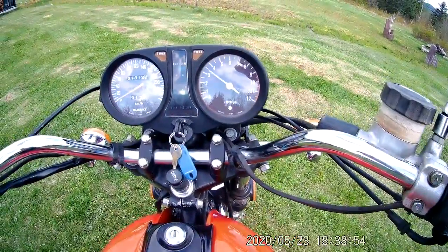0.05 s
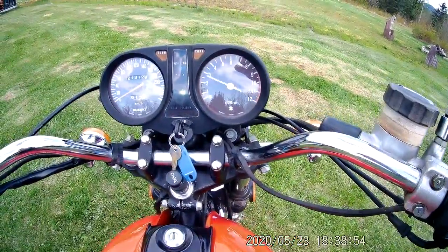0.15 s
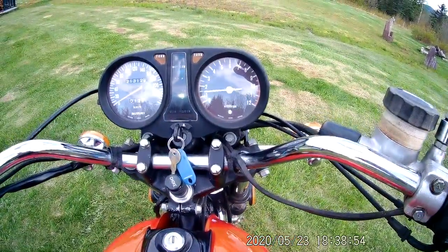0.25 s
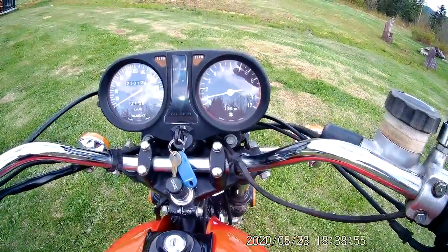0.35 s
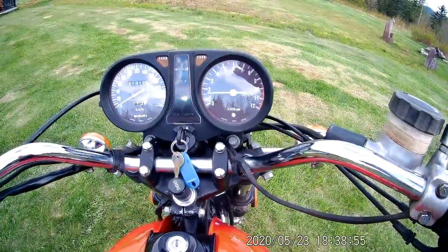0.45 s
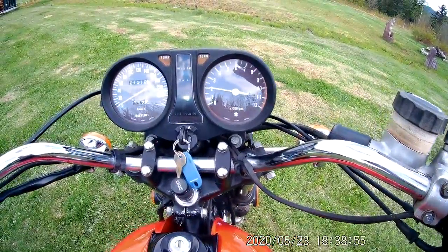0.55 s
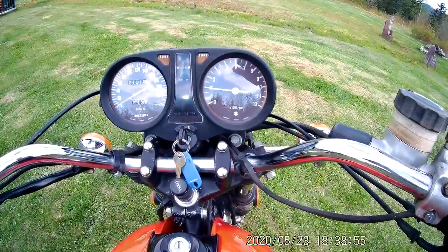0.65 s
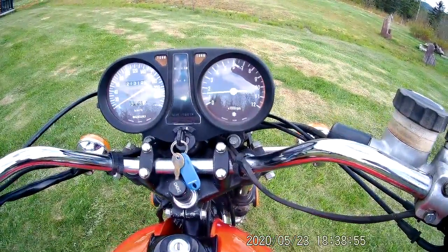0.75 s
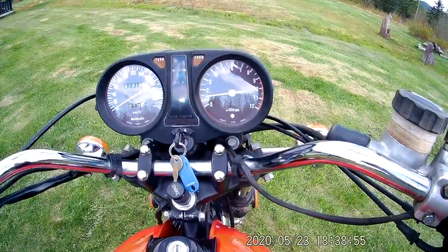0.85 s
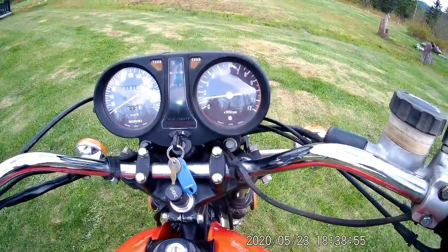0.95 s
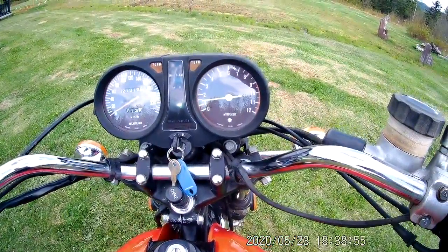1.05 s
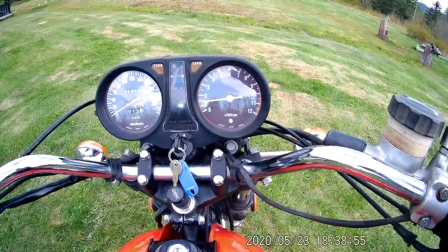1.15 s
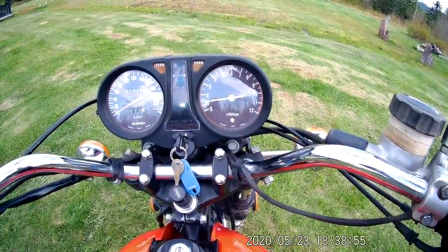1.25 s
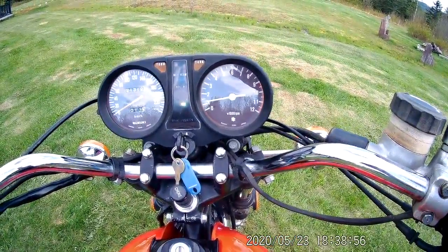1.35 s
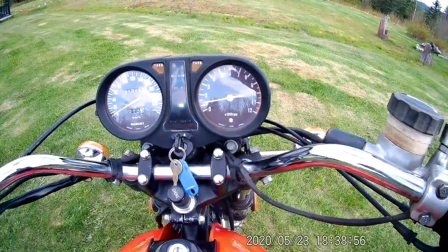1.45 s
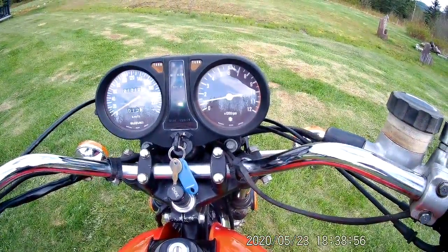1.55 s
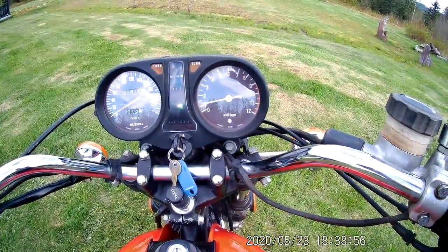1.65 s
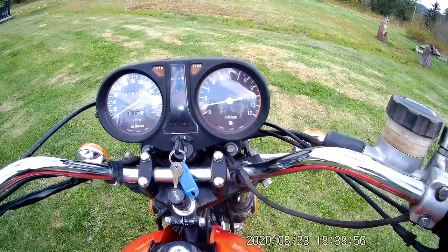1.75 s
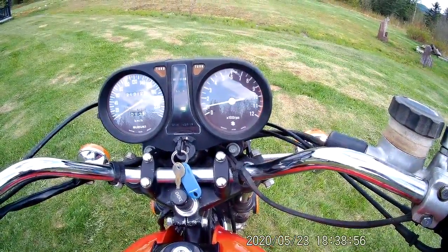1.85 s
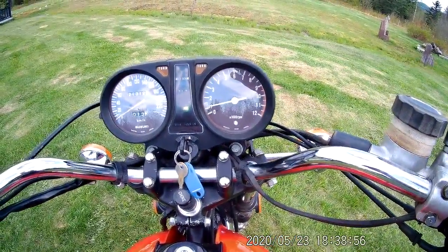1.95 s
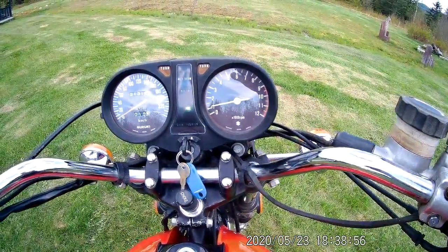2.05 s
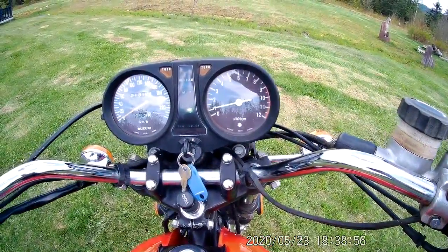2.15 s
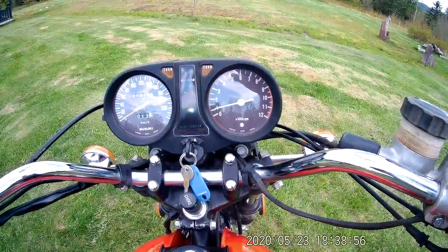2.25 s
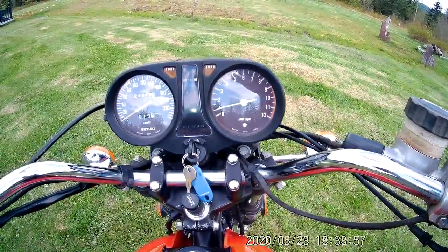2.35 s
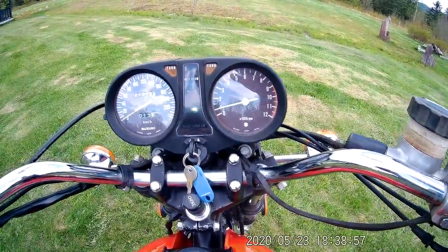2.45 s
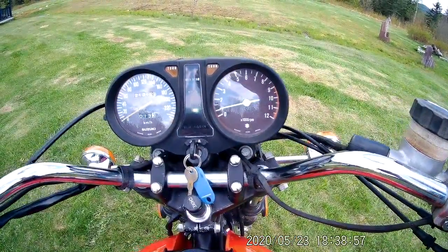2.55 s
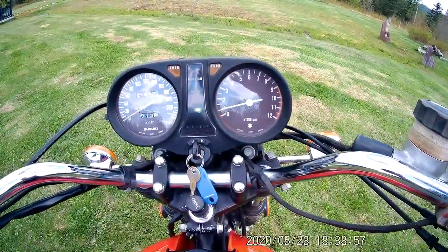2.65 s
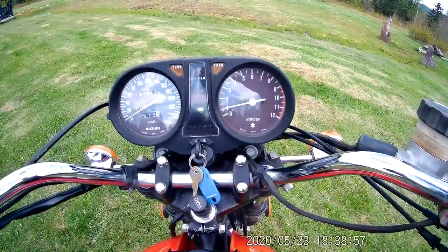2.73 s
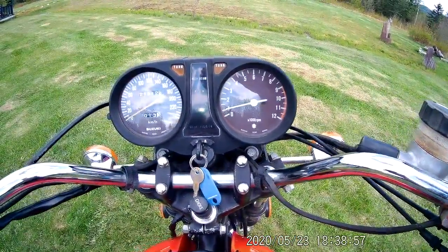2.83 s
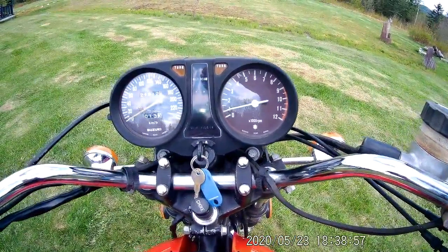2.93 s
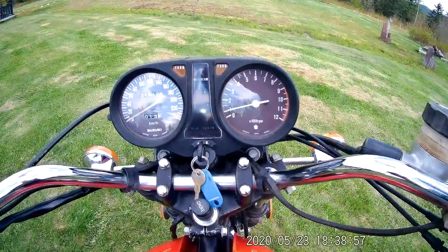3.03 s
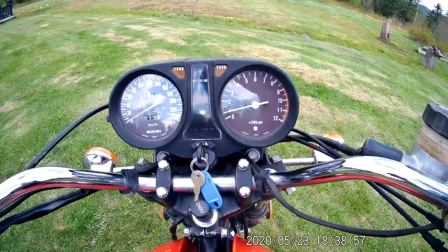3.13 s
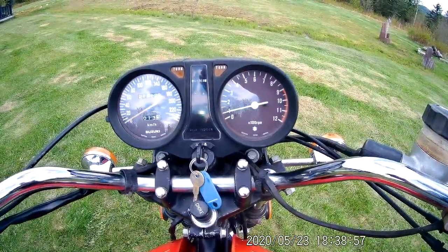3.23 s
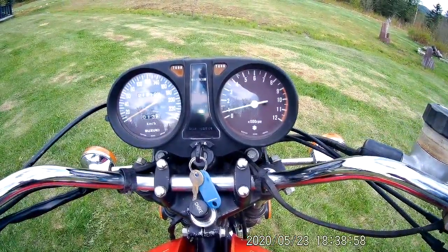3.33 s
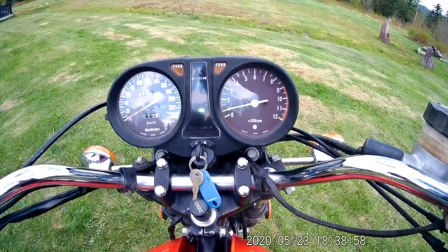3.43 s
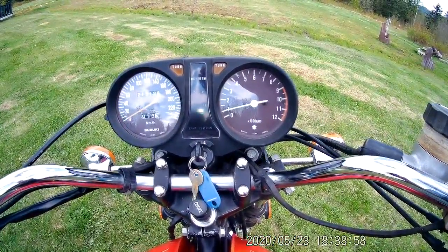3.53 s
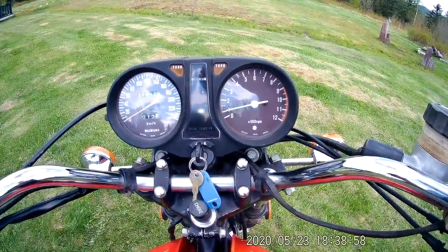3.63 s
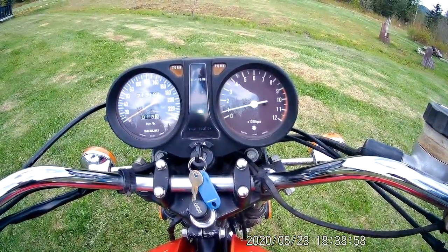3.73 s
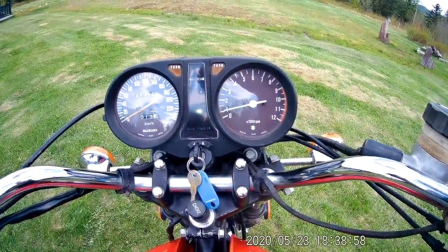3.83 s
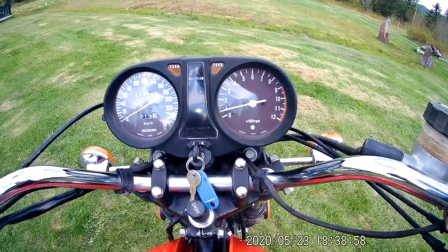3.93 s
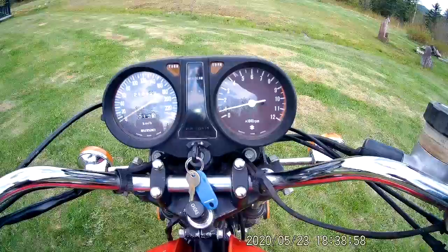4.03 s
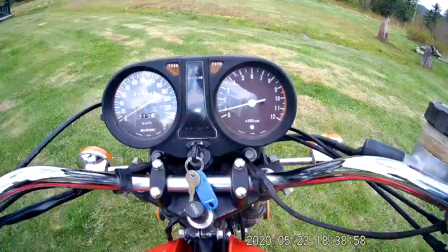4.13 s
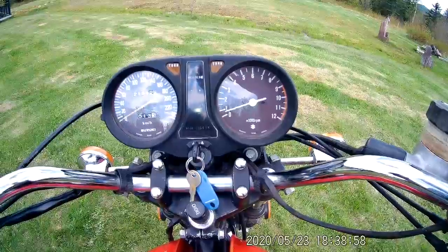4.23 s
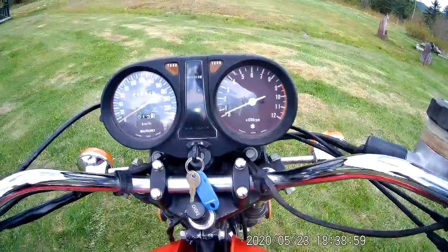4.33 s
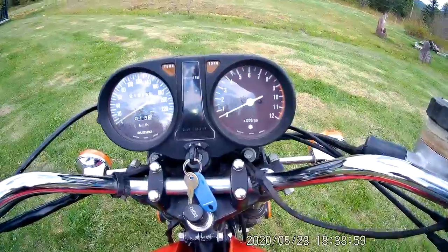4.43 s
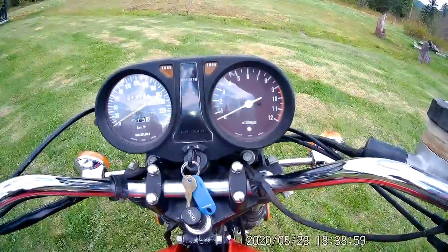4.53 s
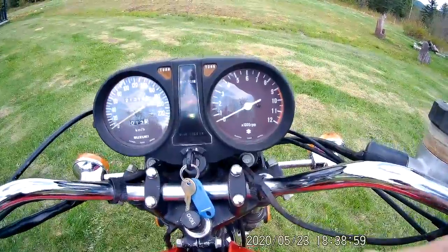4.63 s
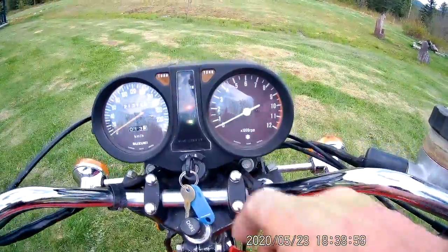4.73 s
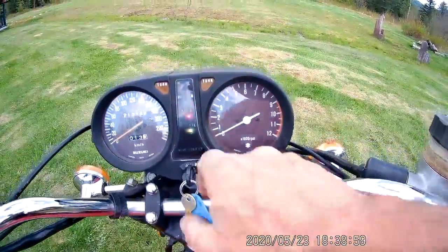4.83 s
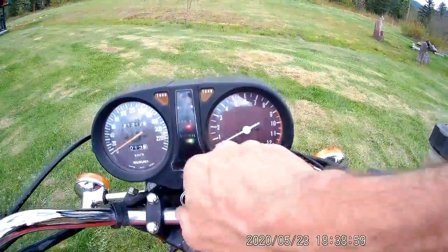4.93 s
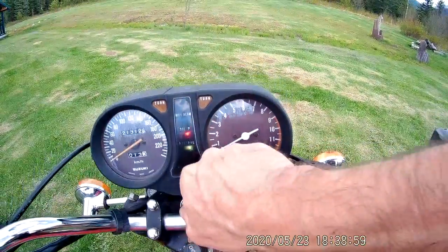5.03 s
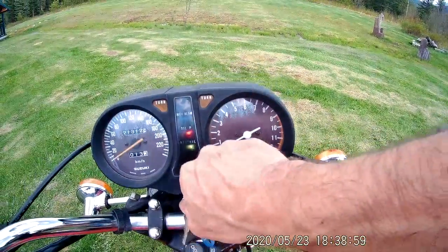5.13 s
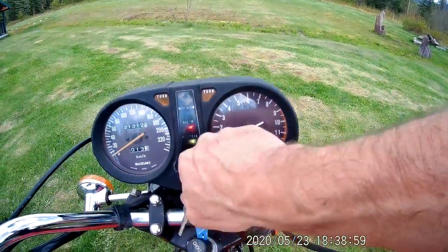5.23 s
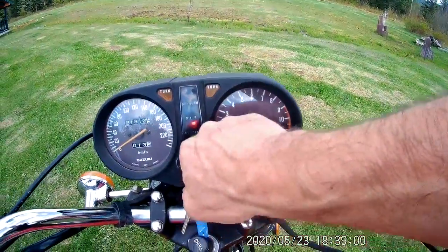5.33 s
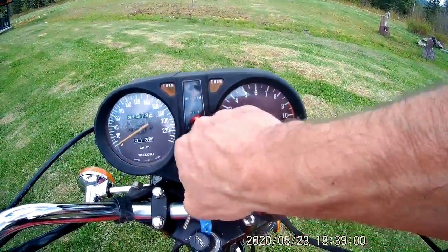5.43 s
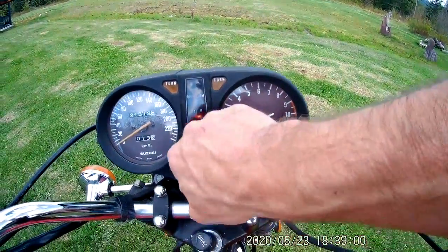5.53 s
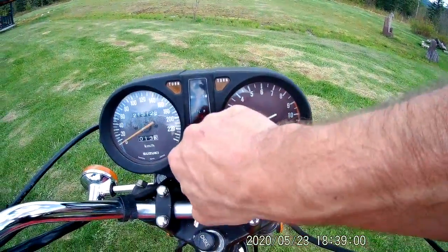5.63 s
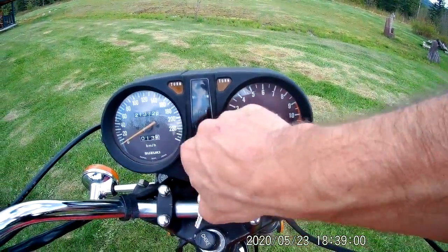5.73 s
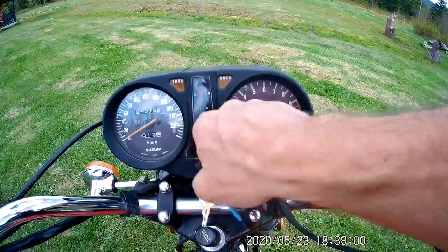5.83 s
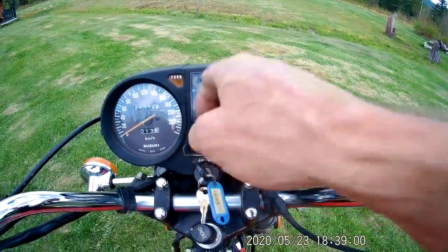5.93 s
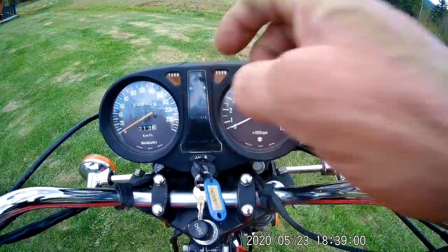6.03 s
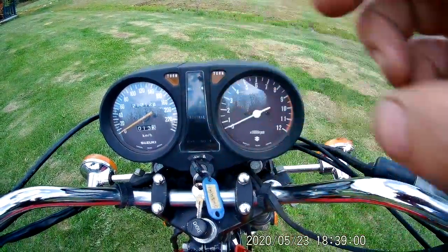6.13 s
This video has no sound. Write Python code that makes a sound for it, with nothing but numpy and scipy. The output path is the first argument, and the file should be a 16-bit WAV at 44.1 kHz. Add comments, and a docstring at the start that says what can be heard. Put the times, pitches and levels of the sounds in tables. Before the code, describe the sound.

A close motorcycle drops to an uneven, clattering idle outdoors, then cuts out, followed by faint key ticks and an ignition lock click.

```python
"""A four-cylinder motorcycle, heard from the saddle on a lawn, sinks from a blip of throttle to a lumpy idle.
Its exhaust is a pulse train filtered by pipes and silencers; impacts of valves, chain and clutch excite
the modes of the cases and fins. The kill switch snaps, the crank runs down and stops with a clunk, then
the keys jingle and the ignition lock clicks off. Trees scatter a faint echo through the still air."""
import sys
import numpy as np
from scipy import signal
from scipy.fft import rfft, irfft
from scipy.io import wavfile
from scipy.ndimage import uniform_filter1d

SR = 44100
rng = np.random.default_rng(int(sys.argv[2]) if len(sys.argv) > 2 else 0)


def transcribe(signal):
    """Save signal, clipped to [-1, 1], as a 16-bit WAV file at the path in sys.argv[1]."""
    frames = np.atleast_2d(signal).T
    limited = np.clip(frames, -1, 1)
    pcm = np.round(limited * 32767).astype(np.int16)
    wavfile.write(sys.argv[1], SR, pcm)


N = 272582
TIME = np.arange(N) / SR


def amp(db):
    """Decibels to amplitude ratio."""
    return 10 ** (np.asarray(db) / 20)


def decay(t, t60):
    """Exponential damping: 60 dB in t60 seconds."""
    return np.exp(-np.log(1000) * t / t60)


def unit_rms(x):
    """Normalisation to an rms of 1."""
    return x / np.sqrt(np.mean(x ** 2))


def unit_peak(x):
    """Normalisation to a peak of 1."""
    return x / np.abs(x).max()


def levelled(x, span_s=0.27):
    """Normalisation to a running rms of 1."""
    power = uniform_filter1d(uniform_filter1d(x ** 2, int(span_s * SR)), int(span_s * SR / 2))
    return x / np.sqrt(np.abs(power) + np.mean(x ** 2) / 10 ** 3)


def colour(x, spectrum):
    """Minimum-phase filtering by a response given as (Hz, dB) points."""
    hz, db = np.transpose(spectrum)
    size = 4096
    bin_hz = np.arange(size + 1) * SR / 2 / size
    gain = amp(np.interp(np.log(bin_hz + 1), np.log(hz), db))
    cepstrum = irfft(np.log(gain))
    cepstrum[1:size] *= 2  # folding the cepstrum makes the filter causal
    cepstrum[size + 1:] = 0
    response = irfft(np.exp(rfft(cepstrum)))[:size]
    return signal.fftconvolve(x, response)[:N]


def noise(spectrum):
    """Filtered Gaussian noise of rms 1."""
    return unit_rms(colour(rng.standard_normal(N), spectrum))


def tilted(spectrum, db_per_octave):
    """Spectral tilt about 1 kHz."""
    return [(hz, db + db_per_octave * np.log2(hz / 1000)) for hz, db in spectrum]


def ring(x, modes):
    """Modal superposition: parallel resonators given as (Hz, bandwidth in Hz, dB)."""
    return sum(amp(db) * signal.lfilter(*signal.iirpeak(hz, hz / width, fs=SR), x)
               for hz, width, db in modes)


def impulses(times, sizes):
    """An impulse train, with times in seconds."""
    return np.bincount(np.clip(np.asarray(times) * SR, 0, N).astype(int), sizes, N + 1)[:N]


def burst(t60):
    """Damped noise stands for the dense modes of a struck part."""
    return rng.standard_normal(SR // 2) * decay(TIME[:SR // 2], t60)


def rattle(blows, t60):
    """Amplitude modulation: each impulse opens a decaying envelope on noise."""
    return signal.lfilter([1], [1, -decay(1 / SR, t60)], blows) * rng.standard_normal(N)


def hit(start_s, peak_db, t60, spectrum):
    """One impact as a filtered noise burst."""
    blow = amp(peak_db) * unit_peak(colour(burst(t60), spectrum))
    return np.pad(blow, (int(start_s * SR), N))[:N]


def struck(times, peak_db, modes, contact_s=0):
    """Impulse excitation of modes; a longer contact softens the attack."""
    attack = np.minimum((TIME + 1 / SR) / (contact_s + 1 / SR), 1)
    tone = unit_peak(ring(impulses([0], [1]), modes) * attack)
    return signal.fftconvolve(impulses(times, amp(peak_db)), tone[:SR])[:N]


def passes(cycles, phase):
    """The times at which the engine cycle reaches a phase from 0 to 1."""
    return np.interp(np.arange(phase, cycles[-1], 1), cycles, TIME)


def scatter(times, spread_db):
    """A bounded log-normal strength for each stroke."""
    return amp(spread_db * np.clip(rng.standard_normal(len(times)), -2, 2))


def wander(rate_hz):
    """Slow random modulation with a spread near 1."""
    steps = np.arange(0, N / SR + 1, 1 / rate_hz)
    return np.interp(TIME, steps, rng.standard_normal(len(steps)))


# Each row: frequency in Hz, relative spectral density in dB.
AIR_SPECTRUM = [(15, -34), (25, 4), (91, -5.5), (113, -4.5), (178, -5), (297, -12), (582, -17.5),
                (804, -20.5), (8130, -34.5), (11800, -28), (15500, -29)]

def still_air(db=-61):
    """Ambient noise: still country air, strongest in the bass."""
    return amp(db) * noise(AIR_SPECTRUM)


def tree_echo(x, t60=0.93, wet_db=-22):
    """Diffuse scattering: the trees round the lawn return a faint, dull echo."""
    spectrum = [(80, -9.5), (200, -6), (600, -2.5), (2000, -22.5), (9000, -11.5)]
    tail = colour(rng.standard_normal(N) * decay(TIME, t60), spectrum)
    return amp(wet_db) * signal.fftconvolve(x, unit_rms(tail) / np.sqrt(N))[:N]


# Each row: frequency in Hz, relative level in dB.
DYING_HISS_SPECTRUM = [(1000, -4), (3500, -5), (8000, -6), (8600, 3), (9200, -13.5), (12000, 2),
                       (15500, -15.5)]

def dying_hiss(db=-60, t60=2.4, stop_s=4.54):
    """Exponential decay: a faint hiss dies away once the engine is still."""
    return amp(db) * decay(np.maximum(TIME - stop_s, 0), t60) * noise(DYING_HISS_SPECTRUM)


# Each row: start in seconds, peak level in dB, 60 dB decay time in seconds, tilt in dB per octave.
KEY_TOUCHES = [(5.174, -47, .05, -0.5), (5.19, -50, 0.034, -4), (5.197, -42.5, .01, 2),
               (5.204, -47, .02, -2), (5.261, -48.5, 0.097, 3)]
# Each row: frequency in Hz, relative level in dB.
KEY_SPECTRUM = [(400, -14), (1700, 7), (2600, -12), (3800, 5), (5500, -14), (8500, -7), (13000, -20),
                (16000, -21)]
# Each row: frequency in Hz, bandwidth in Hz, gain in dB.
KEY_RESONANCES = [(3730, 69, -6), (8140, 17, 5), (10070, 24, -6), (12000, 28, -5)]

def keys():
    """Free vibration: hanging keys, brushed by fingers, tick and ring in lightly damped modes."""
    ticks = sum(hit(s, db, t60, tilted(KEY_SPECTRUM, tilt)) for s, db, t60, tilt in KEY_TOUCHES)
    return ticks + struck([5.262], [-44.5], KEY_RESONANCES)


# Each row: start in seconds, peak level in dB, 60 dB decay time in seconds, tilt in dB per octave.
LOCK_IMPACTS = [(5.547, -47.5, 0.042, -1), (5.593, -38, 0.08, -1.5), (5.5976, -24.5, 0.0076, 1),
                (5.6, -31, 0.022, 4), (5.614, -43, .03, 19), (5.636, -32, 0.009, 4), (5.731, -54, .024, 3),
                (5.959, -40.5, 0.02, -1)]
# Each row: frequency in Hz, relative level in dB.
LOCK_SPECTRUM = [(150, -16), (600, -1), (850, -6), (1150, 4), (1750, 2), (2200, -13.5), (3000, -10),
                 (3600, 2), (5000, -13), (6800, -17), (8100, -8), (9500, -56), (15000, -60)]
# Each row: frequency in Hz, bandwidth in Hz, gain in dB.
BARREL_RESONANCES = [(622, 49, -9), (1120, 80, -1), (1820, 120, -9)]

def ignition_lock():
    """Structural coupling: the barrel clicks into its stop and the instrument housing rings on."""
    clicks = sum(hit(s, db, t60, tilted(LOCK_SPECTRUM, tilt)) for s, db, t60, tilt in LOCK_IMPACTS)
    lock = clicks + struck([5.5988], [-31], BARREL_RESONANCES, contact_s=0.0012)
    housing = signal.fftconvolve(lock, burst(t60=0.17))[:N]
    return lock + amp(-43) * housing


# Each row: frequency in Hz, relative level in dB.
SWITCH_SPECTRUM = [(500, -20), (1000, 2), (1600, 8), (3000, -1), (4200, 0), (6000, -3), (8000, -3),
                   (9300, 6), (11300, -5), (13500, 2), (16000, -8)]

def kill_switch():
    """A brief impact has a broad spectrum: the switch snaps over."""
    return hit(start_s=4.0628, peak_db=-6.5, t60=0.007, spectrum=SWITCH_SPECTRUM)


# The cam chain meshes 30 times a cycle, with sidebands spaced at the crank rate.
# Each row: multiple of the cycle rate, relative level in dB.
MESH_ORDERS = [(16, -7.5), (28, -9), (30, 1), (32, -5.5), (34, -8)]
# Each row: frequency in Hz, bandwidth in Hz, gain in dB.
COVER_RESONANCES = [(239.8, 28, 1), (323.4, 38, -2), (376.2, 26, -2), (484, 21, -4), (562, 70, 0)]

def chain_whine(cycles, flutter_db=2.5, phase_wobble=0.51):
    """Forced vibration: mesh tones glide with the revs and swell at each resonance of the covers."""
    looseness = np.interp(TIME, [.9, 2.2], [.7, 1.7])  # taut on the overrun, flapping at idle
    tones = 0
    for order, db in MESH_ORDERS:
        strength = amp(db + flutter_db * looseness * wander(22))
        phase = 2 * np.pi * order * cycles + phase_wobble * looseness * wander(30)
        tones += strength * np.sin(phase)
    load_db = np.interp(TIME, [0, .3, .5, 4.05, 4.2, 4.5], [-11.5, -13.5, 0, 3, -16, -15.5])
    return ring(tones, COVER_RESONANCES) * amp(load_db)


# The hiss of chain and fins. Each row: frequency in Hz, relative level in dB.
FIN_SPECTRUM = [(1800, -9.5), (3300, -10), (4040, 6.5), (4400, -2), (4800, -1.5), (5200, -14.5),
                (6100, -18.5), (7300, -5.5), (8200, -6.5), (9150, -9), (10200, -10.5), (12000, -10),
                (13700, -18.5), (15500, -31.5)]
# Each row: frequency in Hz, bandwidth in Hz, gain in dB.
FIN_RESONANCES = [(4020, 130, 0), (4300, 120, -2.5), (6800, 150, -12), (7396, 95, -7), (7890, 130, -9),
                  (8680, 150, -9.5), (9000, 150, -8.5), (9180, 110, -6)]

def cooling_fins(blows):
    """Modal overlap: struck and rubbed, the fins' close modes merge into a hiss; a few sing out."""
    shimmer = unit_rms(signal.fftconvolve(blows + rng.standard_normal(N), burst(t60=0.034))[:N])
    rub = unit_rms(amp(3.5) * rng.standard_normal(N) + blows)
    hiss = unit_rms(colour(amp(-4) * shimmer + rub, FIN_SPECTRUM))
    singing = unit_rms(ring(np.abs(blows) * rng.standard_normal(N), FIN_RESONANCES))
    return levelled(hiss + amp(-3) * singing)


# Each row: phase in the cycle from 0 to 1, relative level in dB.
VALVE_SEATINGS = [(.02, -4.5), (.09, -0.5), (.21, -3.5), (.32, -3), (.5, -4.5), (.59, -5), (.7, -2.5),
                  (.765, -1.5)]

def valve_taps(cycles, spread_db=3.5, t60=0.091):
    """Periodic impact: each valve seats once a cycle with a ring of its own."""
    taps = 0
    for phase, db in VALVE_SEATINGS:
        times = passes(cycles, phase)
        seatings = impulses(times, amp(db) * scatter(times, spread_db))
        taps += signal.fftconvolve(seatings, burst(t60))[:N]
    return levelled(taps)


def chain_rattle(cycles, spread_db=2.5, t60=0.024, strikes_per_cycle=40):
    """Load modulation: cam chain links strike the sprocket, harder as each cam loads it."""
    times = np.interp(np.arange(0, cycles[-1], 1 / strikes_per_cycle), cycles, TIME)
    links = impulses(times + rng.random(len(times)) / 1000, scatter(times, spread_db))
    cam_load = 1 + 0.11 * np.sin(2 * np.pi * len(CYLINDER_PULSES) * cycles)
    return levelled(rattle(links, t60) * cam_load)


# Blows on the engine castings. Each row: frequency in Hz, gain in dB.
CASE_SPECTRUM = [(150, -24.5), (280, 6.5), (440, -2), (560, 2.5), (780, -1.5), (1100, 1.5), (1400, 2),
                 (1750, -0.5), (2050, -10), (2700, -19.5), (3400, -30), (4200, -27), (6000, -52.5),
                 (12000, -62)]
# Each row: frequency in Hz, bandwidth in Hz, gain in dB.
CASE_RESONANCES = [(390.6, 10, -2.5), (531.6, 11, -2.5), (719, 4.2, 2), (917.5, 3.6, 1.5),
                   (1033, 11.8, -1.5), (1145, 12, -2.5), (1289, 13, -3.5), (1495.4, 17, 7.5),
                   (1506, 10, 2.5), (1618, 25, -2.5), (1699, 6.5, 3.5), (1824, 28, -3.5), (1947, 11, -9.5),
                   (2118, 6.3, -1), (2480, 18, -10), (2540, 9.4, -20.5)]

def cases(blows, force):
    """Structure-borne sound: the cases radiate the blows and the steady rub of bearings and gears."""
    rubbing = .7 * blows + .7 * rng.standard_normal(N)
    clatter = amp(8.5) * colour(blows * force, CASE_SPECTRUM)
    ringing = amp(13.5) * ring(rubbing * force, CASE_RESONANCES)
    cam_cover = levelled(ring(rubbing, [(1690, 13, 0)]), span_s=0.091)
    high_revs = np.interp(TIME, [.6, 1.2], [1, 0])
    return clatter + ringing + amp(-39) * high_revs * cam_cover


# Each row: start in seconds, peak level in dB.
BACKLASH_KNOCKS = [(0.487, -12), (0.842, -13), (1.753, -11.5), (2.484, -15.5), (3.37, -21.5)]

def drive_knocks(t60=0.057):
    """Backlash: slack in the drive takes up with a hard knock."""
    return sum(hit(s, db, t60, CASE_SPECTRUM) for s, db in BACKLASH_KNOCKS)


# Each row: start in seconds, relative level in dB.
TAPPET_STRIKES = [(0.495, -25), (.632, -21), (.86, -19), (0.927, -14), (1.682, -21), (2.09, -14),
                  (2.293, -15.5), (2.389, -17), (2.77, -13), (2.809, -24), (3.018, -21), (3.081, -18.5),
                  (3.729, -13.5), (3.9, -17.5), (3.953, -19.5), (4.051, -16)]

def loose_tappet(t60=.04):
    """Impact across a clearance: a bright clack, then the free ring of the cases."""
    clacks = sum(hit(s, db, t60, tilted(CASE_SPECTRUM, 9.8)) for s, db in TAPPET_STRIKES)
    ringing = struck(*np.transpose(TAPPET_STRIKES), CASE_RESONANCES)
    return amp(-3) * clacks + amp(-2) * ringing


# Each row: frequency in Hz, bandwidth in Hz, gain in dB.
BASKET_RESONANCES = [(540.4, 27, 9.1), (575, 16, 5.6)]
# The louder knocks. Each row: start in seconds, relative level in dB.
BASKET_STRIKES = [(.514, -20.5), (1.167, -20), (1.314, -16), (1.391, -17), (1.71, -16), (1.749, -19),
                  (1.959, -18), (1.998, -24), (2.08, -17.5), (2.121, -17), (2.438, -17.5), (2.483, -16.5),
                  (2.928, -22.5), (3.017, -28), (3.158, -16), (3.206, -21.5)]

def clutch_basket(cycles, force):
    """Backlash: once the drive goes slack, the basket knocks hollowly each crank turn, at times harder."""
    times = passes(2 * cycles, 0.026)
    knocks = rattle(impulses(times, scatter(times, spread_db=0.5)), t60=0.023)
    slack_db = np.interp(TIME, [.33, .48], [-21.5, -11.5])
    regular = amp(slack_db) * force * levelled(ring(knocks, BASKET_RESONANCES))
    harder = struck(*np.transpose(BASKET_STRIKES), BASKET_RESONANCES, contact_s=0.008)
    return regular + amp(1.5) * harder


# Each row: frequency in Hz, relative level in dB.
CRACK_SPECTRUM = [(100, -18), (380, 1.5), (950, 0), (1400, -2.5), (1800, 0), (2200, -7), (2600, -11),
                  (3200, -17), (3900, -14.5), (4500, -21), (5500, -36), (8500, -44), (14000, -45)]
# Each row: start in seconds, peak level in dB, 60 dB decay time in seconds.
GEAR_CLACKS = [(4.451, -24.5, 0.15), (4.495, -26.5, 0.38), (4.519, -37.5, 0.047), (4.549, -20, 0.13)]

def stop_clunk():
    """Elastic rebound: gears clack, the crank rocks back against compression and the cases ring."""
    crack = hit(start_s=4.5415, peak_db=-18, t60=0.045, spectrum=CRACK_SPECTRUM)
    clacks = sum(hit(s, db, t60, CASE_SPECTRUM) for s, db, t60 in GEAR_CLACKS)
    ringing = ring(crack + clacks, CASE_RESONANCES) + ring(crack, [(2480, 36, 16)])
    return crack + clacks + ringing


# Each row: start in seconds, peak level in dB.
AFTERFIRES = [(.915, -15.5), (1.126, -20)]

def header_pops():
    """Pipe resonance: unburnt charge pops in the header as the revs settle."""
    return struck(*np.transpose(AFTERFIRES), [(195, 38, 0)], contact_s=0.0055)


# Each row: start in seconds, peak level in dB.
LAST_PUFFS = [(4.152, -8.5), (4.184, -11.5), (4.248, -13.5), (4.287, -22), (4.337, -17), (4.403, -31)]
# Each row: frequency in Hz, bandwidth in Hz, gain in dB.
PUFF_RESONANCES = [(45, 40, -5), (99, 42, 0)]

def chugs(t60=0.35):
    """Cavity resonance: with the spark off, separate puffs of unburnt charge boom in the silencers."""
    times, db = np.transpose(LAST_PUFFS)
    ringing = ring(impulses([0], [1]), PUFF_RESONANCES)
    puff = unit_peak(colour(ringing, SILENCER_RESPONSE) * decay(TIME, t60))
    return signal.fftconvolve(impulses(times, amp(db)), puff)[:N]


# Surging exhaust gas. Each row: frequency in Hz, relative level in dB.
GAS_SPECTRUM = [(20, -38.5), (45, -18.5), (70, -12), (95, -3.5), (110, -4), (125, -7), (150, -14.5),
                (200, -15.5), (280, -25), (450, -34.5), (900, -65)]

def burble(cycles, from_s=.77, to_s=1.17, peak_db=-21, t60=.08):
    """Pressure transients: late, strong burns thump in the silencers once a cycle on the overrun."""
    times = passes(cycles, 0.49)
    times = times[(times > from_s) & (times < to_s)]
    burns = impulses(times, np.full(len(times), amp(peak_db)))
    thump = colour(impulses([0], [1]), GAS_SPECTRUM) * decay(TIME, t60)
    return signal.fftconvolve(burns, unit_peak(thump[:SR // 10]))[:N]


# Each row: centre in seconds, drive in dB relative to the exhaust note.
HARD_FIRINGS = [(1.32, -2), (1.965, -6), (2.16, -14), (2.335, -0.5), (2.425, -5.5), (2.52, -7.5),
                (2.89, -9.5), (2.965, -0.5), (3.055, -2), (3.24, -8.5), (3.33, -5), (3.88, -8), (3.97, -5)]
# Each row: frequency in Hz, bandwidth in Hz, gain in dB.
CHAMBER_RESONANCES = [(97, 42, 0)]

def chamber_boom(note, width_s=0.019):
    """Resonant build-up: at idle some firings catch harder and the silencer chamber booms on."""
    swell = sum(amp(db) * np.exp(-((TIME - s) / width_s) ** 2) for s, db in HARD_FIRINGS)
    return ring(note * swell, CHAMBER_RESONANCES)


# In firing order. Each row: relative level in dB, change on a shut throttle in dB, pipe delay in ms.
CYLINDER_PULSES = [(4.5, 0.5, 0.74), (8, -6.5, 0.11), (5, 4, .8), (5, -1, 0.092)]
# Each row: frequency in Hz, gain in dB.
SILENCER_RESPONSE = [(10, -51), (22, -22.5), (31, -3), (44, 1), (65, 2), (88, 3), (108, 5.5), (125, -4.5),
                     (145, -11), (200, -15), (260, -24), (450, -26), (900, -71)]
# Each row: frequency in Hz, bandwidth in Hz, gain in dB.
PIPE_RESONANCES = [(310.3, 5.7, 7.5), (333.4, 13, 5.5), (374, 5.7, -13)]

def exhaust(cycles, spread_db=0.7, jitter_ms=0.43, pipe_db=-14.5, gas_db=-6, idle_lope=0.74):
    """Source and filter: uneven puffs excite silencers and pipes; turbulent gas adds noise."""
    lumpiness = np.interp(TIME, [0, 1.5], [.4, 1])  # firing grows less even towards idle
    puffs = 0
    for k, (db, shut_db, delay_ms) in enumerate(CYLINDER_PULSES):
        times = passes(cycles, k / len(CYLINDER_PULSES))
        # a shut throttle starves one cylinder, so the note lopes once a cycle
        overrun = np.interp(times, [.08, .3, 1.15, 1.4], [0, 1, 1, idle_lope])
        unevenness = scatter(times, spread_db * np.interp(times, TIME, lumpiness))
        lag_ms = delay_ms + jitter_ms * rng.standard_normal(len(times))
        puffs += impulses(times + lag_ms / 1000, amp(db + shut_db * overrun) * unevenness)
    silencers = levelled(colour(puffs, SILENCER_RESPONSE))
    pipes = amp(pipe_db) * levelled(ring(puffs, PIPE_RESONANCES))
    gas = amp(gas_db) * noise(GAS_SPECTRUM)
    return silencers + lumpiness * (pipes + gas)


# A cylinder misses. Each row: centre in seconds, change of exhaust level in dB.
MISSED_FIRINGS = [(1.845, -8), (2.031, -8), (2.2, -9), (2.39, -1.5), (2.81, -7.5), (3.19, -5.5),
                  (3.455, -4), (3.81, -11.5)]

def load_levels(firing_hz, idle_hz=43.5, stall_hz=26, kill_s=4.06, miss_width_s=0.014):
    """Radiated level follows load: throttle, revs, engine braking and the run-down add in decibels."""
    throttle = np.interp(TIME, [0, 0.059], [1, 0])
    braking = np.interp(TIME, [.31, .74, 1.18, 2.18], [0, 1, 1, 0])
    unfired = np.interp(TIME, [4.16, 4.18], [0, 1])  # the cylinders only pump air
    coasted_s = np.maximum(TIME - kill_s, 0)
    revs_db = 5 * np.log2(firing_hz / idle_hz)
    stall_db = 28.5 * np.minimum(np.log2(firing_hz / stall_hz), 0)
    roll_db = np.maximum(stall_db, -14)  # the stalling clatter keeps a quiet roll
    missed_db = sum(db * np.exp(-((TIME - s) / miss_width_s) ** 2) for s, db in MISSED_FIRINGS)
    exhaust_db = -19 + 10 * throttle + 0.5 * braking - 3.5 * unfired + revs_db + missed_db + stall_db
    clatter_db = -24 + 5 * throttle + braking - 15 * coasted_s + roll_db
    hiss_db = -38.5 + 6 * throttle + 4.5 * braking - 64.5 * coasted_s + stall_db
    return exhaust_db, clatter_db, hiss_db


# The revs sink, then hunt round idle. Each row: time in seconds, firing rate in Hz.
FIRING_RATES = [(0, 112.45), (.11, 98.77), (.33, 81.07), (.64, 71.29), (.94, 61.06), (1.3, 52.65),
                (1.7, 49.38), (2.07, 46.87), (2.45, 43.72), (2.78, 45.49), (3.13, 42.36), (3.5, 44.55),
                (4.05, 43.15)]
# With the spark off. Each row: time in seconds, rate of compression strokes in Hz.
COASTING_RATES = [(4.15, 40.2), (4.298, 31.5), (4.42, 21), (4.54, 3.2)]

def engine():
    """Phase locking: exhaust and machinery share one cycle of four firings in two crank turns."""
    firing_hz = np.interp(TIME, *np.transpose([*FIRING_RATES, *COASTING_RATES]))
    turning = np.interp(TIME, [4.53, 4.57], [1, 0])
    cycles = np.cumsum(firing_hz * turning) / SR / len(CYLINDER_PULSES)
    exhaust_gain, force, hiss_gain = (amp(db) * turning for db in load_levels(firing_hz))
    impacts = valve_taps(cycles) + amp(-0.5) * chain_rattle(cycles)
    # as the crank slows, separate blows give way to gears rolling
    crossfade = np.interp(TIME, [4.1, 4.42], [0, np.pi / 2])
    blows = np.cos(crossfade) * impacts + np.sin(crossfade) * rng.standard_normal(N)
    clatter = cases(blows, force) + drive_knocks() + loose_tappet()
    clutch = clutch_basket(cycles, force * np.cos(crossfade))
    hiss = hiss_gain * cooling_fins(blows)
    note = exhaust_gain * exhaust(cycles)
    whine = amp(-27) * turning * chain_whine(cycles)
    thumps = chamber_boom(note) + header_pops() + burble(cycles) + chugs()
    return note + thumps + clatter + clutch + whine + hiss


def scene():
    """Superposition of the motorcycle, its echo and the open air."""
    bike = engine() + stop_clunk() + dying_hiss() + kill_switch() + keys() + ignition_lock()
    return (bike + still_air() + tree_echo(bike))[None]


def record(dry, ceiling=.75, top_hz=15700):
    """Soft saturation rounds the loudest peaks, and a low-pass filter cuts the highest treble."""
    rounded = dry / (1 + (dry / ceiling) ** 6) ** (1 / 6)
    return signal.sosfilt(signal.ellip(8, .2, 70, top_hz, fs=SR, output="sos"), rounded)


dry = scene()
out = record(dry)
transcribe(out)
```